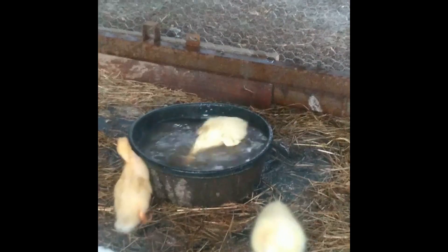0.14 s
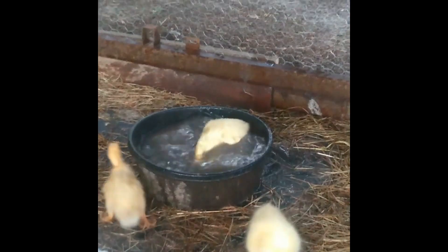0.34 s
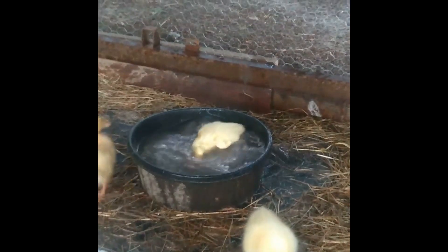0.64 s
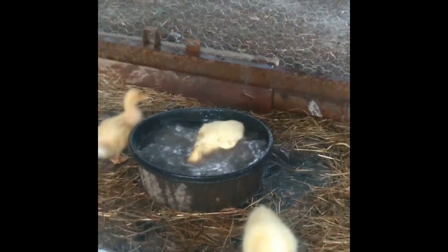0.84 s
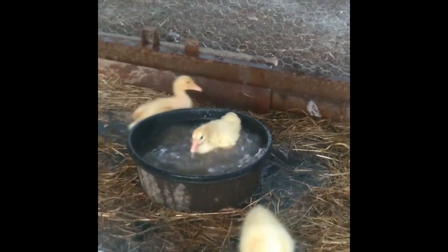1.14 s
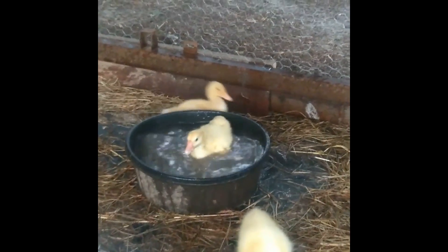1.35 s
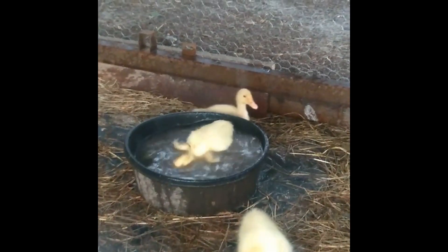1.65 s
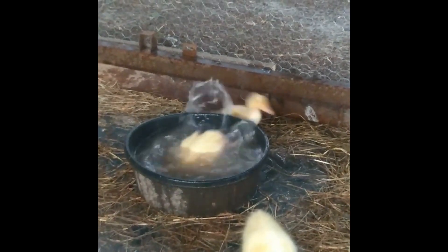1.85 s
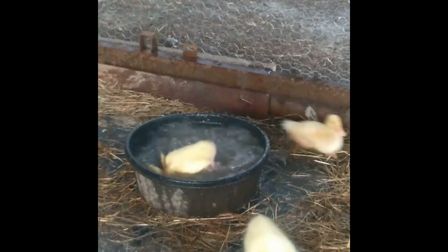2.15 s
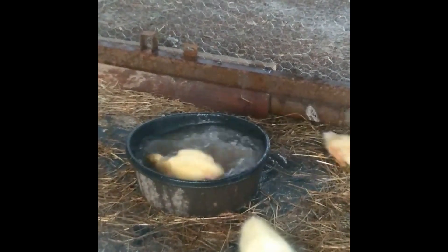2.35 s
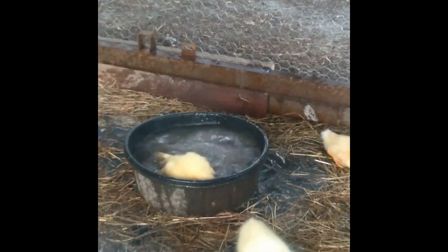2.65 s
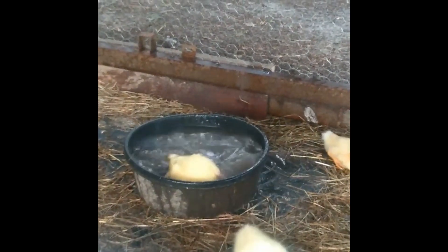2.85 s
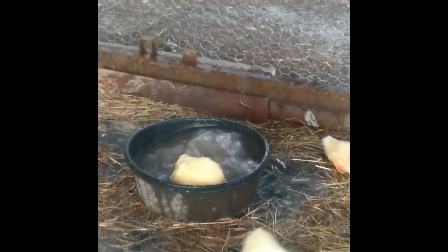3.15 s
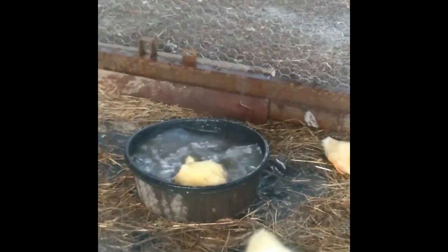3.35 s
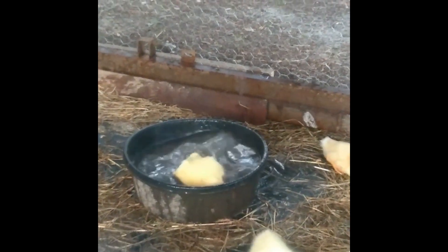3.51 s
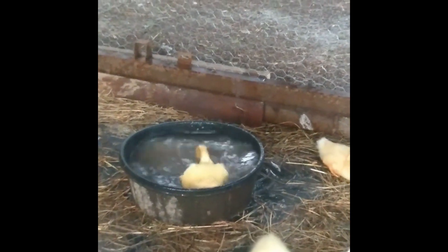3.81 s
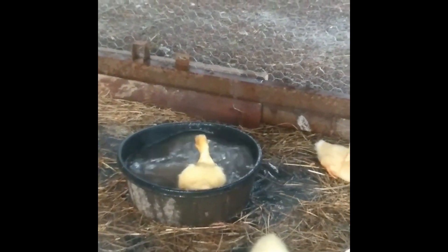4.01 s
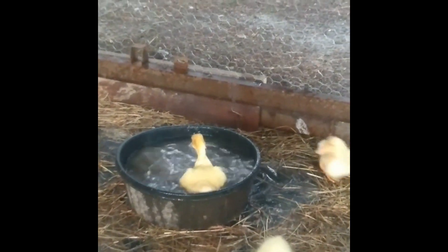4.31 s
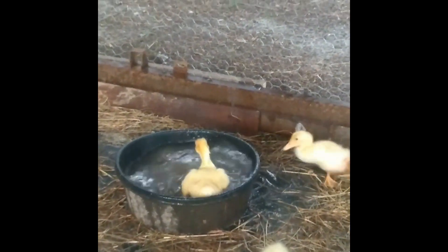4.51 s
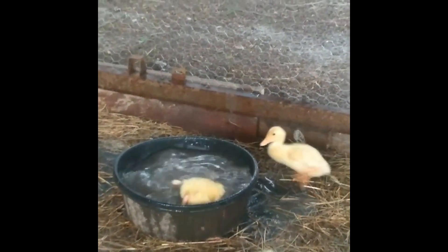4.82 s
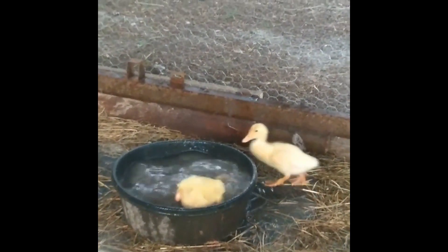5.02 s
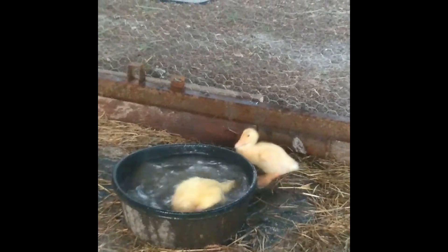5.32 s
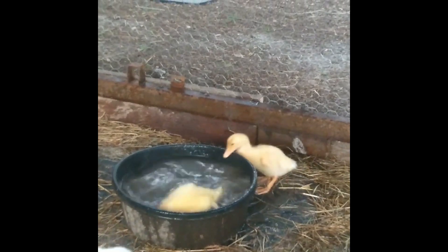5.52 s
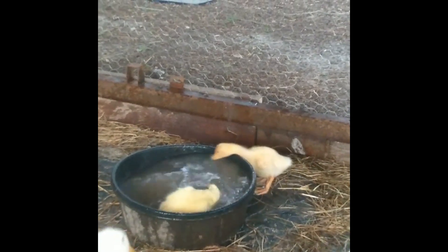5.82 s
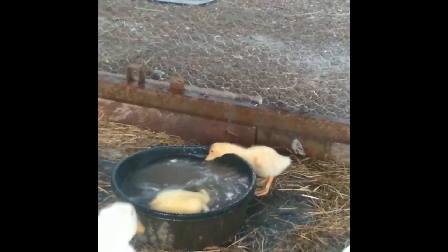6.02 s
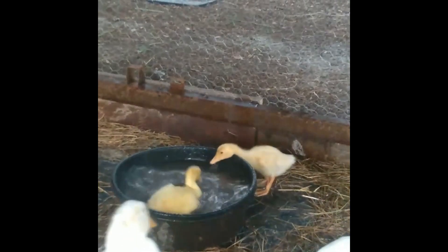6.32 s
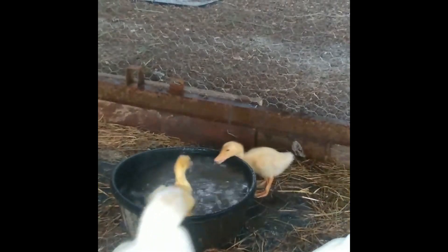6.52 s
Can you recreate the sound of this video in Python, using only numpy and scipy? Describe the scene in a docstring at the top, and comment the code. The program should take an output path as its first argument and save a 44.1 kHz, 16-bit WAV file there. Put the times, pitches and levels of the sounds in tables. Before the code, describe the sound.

After a brief near silence, an outdoor pen fades in at about 0.5 seconds with soft air and a faint hum. Goslings call throughout in high, falling peeps, short chirps and softer breathy notes, busiest between 2 and 3.5 seconds. Around 1 second, one sloshes in a plastic tub with wet pops and squelches. A bigger splash near 2 seconds throws bubbles and crackling spray, followed by low gulps, lapping and scattered drips. A nearby wire panel jingles lightly several times between 1.3 and 3.3 seconds. A distant fowl gives one faint, hoarse call around 3.5 seconds. Then four hard, close knocks hit the panel at about 5.1, 5.5, 6 and 6.5 seconds, the loudest sounds of all: the frame booms, the mesh clatters and single wires ring. A few peeps and drops continue between them, and a light jingle follows the last.

```python
"""Goslings and a bath in a farm pen

Goslings peep, chip and murmur around a plastic tub while one bathes: bubbles ring, spray crackles,
drops land. Something close by, probably the pen's wire panel, jingles lightly and takes four hard
knocks: the frame booms, the mesh clatters, single wires ring. A far fowl calls once over a faint hum."""
import sys
import numpy as np
from scipy import signal
from scipy.fft import rfft, irfft, next_fast_len
from scipy.io import wavfile
from scipy.ndimage import uniform_filter1d

SR = 44100
rng = np.random.default_rng(int(sys.argv[2]) if len(sys.argv) > 2 else 0)


def to_wav(sig):
    """Store sig (one row per channel, or 1-D mono) as 16-bit WAV at the path in sys.argv[1].

    Samples outside -1..1 are clipped; the rate is SR.
    """
    pcm = np.clip(np.atleast_2d(sig), -1, 1) * 32767
    pcm = np.round(pcm).astype(np.int16)
    wavfile.write(sys.argv[1], SR, pcm.T)  # frames by channels


N = 293732
T = np.arange(N) / SR


def undb(db):
    """Decibels to gain."""
    return 10 ** (np.asarray(db) / 20)


def unit(x):
    """Scale to rms 1."""
    return x / np.sqrt(np.mean(x ** 2) + 1e-20)


def loudest(x, db):
    """Set the level of the loudest 50 ms."""
    power = uniform_filter1d(np.mean(np.atleast_2d(x) ** 2, axis=0), SR // 20)
    return x * undb(db) / np.sqrt(power.max() + 1e-20)


def add(out, at_s, x):
    """Mix x into out from at_s on."""
    i = max(int(at_s * SR), 0)
    out[..., i:i + x.shape[-1]] += x[..., :max(N - i, 0)]


def pan(db):
    """Channel gains for a left minus right level."""
    return undb(np.array([[db], [-db]]) / 2)


def spread(x, width):
    """Three independent rows to stereo: one shared, one per side."""
    return np.sqrt(1 - width) * x[0] + np.sqrt(width) * x[1:]


def colour(x, points):
    """Filter by a curve of (frequency [Hz], gain [dB]) points."""
    hz, db = np.transpose(points)
    size = next_fast_len(x.shape[-1])
    bins_hz = np.maximum(np.fft.rfftfreq(size, 1 / SR), 1)
    gain = undb(np.interp(np.log(bins_hz), np.log(hz), db))
    return irfft(rfft(x, size) * gain, size)[..., :x.shape[-1]]


def clicks(size, rate_hz, scatter_db):
    """Three rows of random impulses of uneven strength."""
    hit = rng.random((3, size)) < rate_hz / SR
    sign = rng.choice([-1, 1], (3, size))
    strength = undb(scatter_db * np.clip(rng.standard_normal((3, size)), -2, 2))
    return unit(hit * sign * strength)


def walk(size, rate_hz):
    """Smooth random drift, spread near 1."""
    step = max(int(SR / rate_hz), 2)
    return uniform_filter1d(np.repeat(rng.standard_normal(size // step + 1), step), step)[:size]


def swell(t, rise_s, hold_s, t60_s):
    """Envelope: rise, hold, exponential decay."""
    return np.minimum(t / rise_s, 1) ** 2 * undb(-60 * np.maximum(t - rise_s - hold_s, 0) / t60_s)


def arc(u, crest):
    """Envelope over u = 0..1: up to 1 at the crest (limited to 0.1..0.9), back to 0."""
    return np.sin(np.pi * np.interp(u, [0, np.clip(crest, .1, .9), 1], [0, .5, 1])).clip(0)


def progress(length_s):
    """Ramp from 0 to 1."""
    return np.linspace(0, 1, int(length_s * SR))


def phase_of(hz):
    """Running phase of a pitch curve."""
    return 2 * np.pi * np.cumsum(hz) / SR


def ring(force, modes):
    """Driven damped modes: (frequency [Hz], rms level [dB], t60 [s])."""
    out = 0
    for hz, db, t60_s in modes:
        pole = np.exp((2j * np.pi * hz - np.log(1000) / t60_s) / SR)
        mode = signal.lfilter([1, -1], [1, -2 * pole.real, abs(pole) ** 2], force)
        out = out + undb(db) * unit(mode)
    return out


def direct_plus(tail, tail_db):
    """Impulse response: direct path plus a tail of given energy."""
    response = undb(tail_db) * tail / np.sqrt(np.sum(tail ** 2, axis=1, keepdims=True))
    response[:, 0] += 1
    return response


def scattered(x, echo_db=-2, t60_s=0.069):
    """Short detours over tub, ground and boards roughen a call's glide."""
    t = T[:SR // 10]
    detours = spread(clicks(len(t), 1500, 3), .7) * swell(t, .003, 0, t60_s)
    response = direct_plus(detours, echo_db)
    return signal.fftconvolve(x[None], response, axes=1) / np.hypot(1, undb(echo_db))


def pen(x, tail_db=-16, t60_s=0.48, echo_db=-11, loss_db_per_s=300):
    """Quick echoes off ground, tub and boards, then a short tail."""
    t = T[:SR // 2]
    tail = rng.standard_normal((2, len(t))) * swell(t, 0.015, 0, t60_s)
    response = direct_plus(tail, tail_db)
    for ear in response:
        lags_s = rng.uniform(.002, .018, 5)
        ear[(lags_s * SR).astype(int)] += undb(echo_db - loss_db_per_s * lags_s)
    return signal.fftconvolve(x, response, axes=1)[:, :N]


# outdoor air spectrum: (frequency [Hz], gain [dB])
AIR_SPECTRUM = [(25, -39), (59, -3.5), (117, -6), (270, -18), (439, -20.5), (988, -3.5), (1440, -12.5),
                (2160, -9), (2690, -13.5), (5000, -18.5), (10400, -18), (14400, -66)]


def yard(air_db=-63.5, hum_hz=131, hum_db=-66):
    """Still outdoor air, near mono in the bass, and a wavering hum."""
    noise = rng.standard_normal((3, N))
    side = colour(noise[1:], [(100, -3.5), (500, -3), (1500, -6)])
    mid = colour(noise[0], [(500, 6), (1500, -13)])
    air = unit(colour(mid + side, AIR_SPECTRUM)) * undb(air_db)
    hum = np.sin(phase_of(hum_hz * (1 + 0.024 * walk(N, 24.4))))
    return air + hum * undb(hum_db + walk(N, 33))


# fowl's pitch contour: (time [s], pitch [Hz])
FOWL_PITCH = [(3.27, 504.5), (3.4, 514.6), (3.57, 571.6), (3.68, 553), (3.78, 558), (3.88, 547)]


def fowl(level_db=-59.5, rough=0.063, flutter_db=4):
    """One long, hoarse, distant call, blurred by the yard."""
    times_s, pitch_hz = np.transpose(FOWL_PITCH)
    effort = arc((T - times_s[0]) / (times_s[-1] - times_s[0]), .62) ** 0.14
    phase = phase_of(np.interp(T, times_s, pitch_hz) * (1 + rough * walk(N, 130)))
    tone = sum(undb(db) * np.sin(k * phase) for k, db in enumerate([0, -4, -21], 1))
    call = tone * effort * undb(level_db + flutter_db * walk(N, 30))
    return scattered(call, echo_db=3, t60_s=0.41)[:, :N]


# wet squelches: (time [s], length [s], start pitch [Hz], end pitch [Hz], relative level [dB])
SQUELCH_GLIDES = [(0.866, 0.041, 1946, 1456, -42.5), (1.028, 0.0405, 1739, 2242, -42.5),
                  (1.059, 0.0323, 2190, 1288, -32.5), (1.703, 0.097, 1056, 1290, -54.5)]


def squelches(rough=0.114, flutter_db=3, trim_db=-3):
    """Air squeezed through water: a rough, gliding resonance."""
    out = np.zeros((2, N))
    for at_s, length_s, start_hz, end_hz, db in SQUELCH_GLIDES:
        size = int(length_s * SR)
        hz = np.linspace(start_hz, end_hz, size) * (1 + rough * walk(size, 1200))
        envelope = np.hanning(size) * undb(flutter_db * walk(size, 362))
        add(out, at_s, unit(np.sin(phase_of(hz)) * envelope) * undb(db + trim_db))
    return out


# runs of pops: (time [s], length [s], level [dB])
POP_RUNS = [(0.843, 0.029, -48), (0.89, 0.022, -35), (1.015, 0.055, -44), (1.086, 0.013, -37.5)]
# pop resonances: (frequency [Hz], relative level [dB], t60 [s])
POP_MODES = [(823, 5, 0.017), (1170, 3, 0.014), (1640, -1, 0.021), (2200, -16, 0.016), (6510, -3.5, 0.023)]


def splutters(rate_hz=209.5, jitter=0.14, pop_t60_s=0.0074):
    """Air breaks through water in a quick run of ringing pops."""
    out, t = np.zeros((2, N)), T[:SR // 8]
    for at_s, length_s, db in POP_RUNS:
        cycle = np.cumsum(rate_hz * (1 + jitter * walk(len(t), 200))) / SR % 1
        envelope = undb(-60 * cycle / rate_hz / pop_t60_s) * arc(t / length_s, .5)
        pops = spread(rng.standard_normal((3, len(t))), .15) * envelope
        ringing = colour(ring(pops, POP_MODES), [(7000, 0), (11000, -14)])
        add(out, at_s, unit(ringing) * np.sqrt(length_s / t[-1]) * undb(db))
    return out


# spectrum of spray, drop impacts and lapping: (frequency [Hz], gain [dB])
SPRAY_SPECTRUM = [(300, -51), (1500, -2.5), (4000, 12), (7000, 10), (11000, 13), (16000, 2.5)]
# lapping envelope: (time [s], level [dB])
LAPPING_LEVEL = [(.5, -67.5), (1.8, -63), (2.2, -44), (2.36, -59), (2.8, -65.5), (3.9, -72.5), (4.8, -60),
                 (6.6, -66)]


def lapping(rate_hz=500, swing_db=4):
    """Water laps in the tub with a fine, uneven crackle."""
    crackle = unit(colour(spread(clicks(N, rate_hz, 0.87), 0.95), SPRAY_SPECTRUM))
    return crackle * undb(np.interp(T, *np.transpose(LAPPING_LEVEL)) + swing_db * walk(N, 13))


# drop impacts: (time [s], relative level [dB], ring pitch [Hz])
DROP_IMPACTS = [(0.614, -54.5, 6800), (1.712, -46, 9100), (1.859, -47, 3400), (1.918, -26, 4300),
                (1.934, -29, 4150), (1.979, -32, 3760), (2.053, -34.5, 6800), (2.067, -36, 6160),
                (2.117, -24, 3820), (2.295, -36.5, 4600), (4.157, -45, 10800), (4.456, -47.5, 6900),
                (4.662, -34.5, 10900), (4.683, -35, 7900), (4.836, -51, 9000), (4.990, -32, 4170),
                (5.438, -31.5, 7830), (5.99, -46, 7000), (6.332, -34.5, 3850)]


def drops(crack_t60_s=0.025, splat_t60_s=0.15, splat_db=-9, ping_db=3, trim_db=-4):
    """Each drop lands with a sharp crack, a softer splat and a short ping."""
    out, t = np.zeros((2, N)), T[:SR // 10]
    landing = swell(t, .002, 0, crack_t60_s) + undb(splat_db) * swell(t, .002, 0, splat_t60_s)
    for at_s, db, hz in DROP_IMPACTS:
        impact = unit(colour(spread(clicks(len(t), 9000, 4.5), .6), SPRAY_SPECTRUM)) * landing
        ping = np.sin(2 * np.pi * hz * t) * swell(t, .002, 0, .014)
        add(out, at_s - .001, (impact + undb(ping_db) * ping) * undb(db + trim_db))
    return out


def bubbles(size, centre_hz, width_oct, cycles=34, glide=0.09, count=100):
    """A cloud of small bubbles, each ringing down as its pitch rises."""
    out = np.zeros((2, N))
    places = (np.arange(count) + rng.random(count)) / count
    for place, detune, strength, side in zip(places, *rng.standard_normal((3, count))):
        hz = np.clip(centre_hz * 2 ** (.6 * width_oct * detune), 110, 12000)
        u = np.linspace(0, 1, int(cycles * SR / hz))
        tone = np.sin(2 * np.pi * cycles * u * (1 + glide * u)) * undb(-45 * u)
        add(out, place * size / SR, tone * undb(3.5 * strength) * pan(2.5 * side))
    return unit(out[:, :size])


# sloshes and low gulps: (time [s], t60 [s], level [dB], bubble pitch [Hz])
BATH_SLOSHES = [(.838, 0.21, -43, 965), (.84, 0.53, -43, 185), (0.891, 0.15, -42.5, 1150),
                (1.022, 0.54, -44, 1038), (1.016, 0.72, -47, 201.3), (1.41, 0.38, -53, 1513),
                (1.856, 0.51, -48, 1860), (1.885, 0.62, -40.5, 1375), (1.912, 0.49, -40.5, 1660),
                (1.968, 0.17, -38.5, 1600), (2.042, 0.54, -40.5, 1300), (2.12, 0.5, -59.5, 2880),
                (2.483, 0.13, -57.5, 300), (2.734, 0.11, -55, 295), (3.22, 0.96, -56, 334),
                (3.508, 0.49, -41, 173.5), (3.675, 0.57, -45, 219), (4.149, 0.079, -55, 283),
                (4.667, 0.28, -60.5, 2940), (4.825, 0.073, -50, 254), (6.255, 0.7, -58.5, 2700)]


def sloshes(rise_s=0.0094, width_oct=0.805, foam_db=-13, droplet_db=-4,
            spray_db_per_oct=11.5, spray_even_hz=1430, flutter_db=2.5):
    """The bather throws water: bubbles, foam and spray; the finer the bubbles, the more spray."""
    out, t = np.zeros((2, N)), T[:SR * 2 // 5]
    for at_s, t60_s, db, hz in BATH_SLOSHES:
        foam_band = [(hz * 2 ** (width_oct * k), -3 * k * k - 3 * width_oct * k) for k in range(-4, 5)]
        foam = unit(colour(spread(clicks(len(t), 3000, 5), .2), foam_band))
        crackle = colour(spread(clicks(len(t), 550, 1.5), 1), SPRAY_SPECTRUM)
        crackle = unit(colour(crackle, [(7000, 0), (14000, -12)]))
        droplets = bubbles(len(t), 4600, width_oct, cycles=82, count=120)
        spray = undb(-1) * crackle + undb(droplet_db) * droplets
        spray_db = spray_db_per_oct * np.log2(hz / spray_even_hz)
        water = bubbles(len(t), hz, width_oct) + undb(foam_db) * foam + undb(spray_db) * spray
        envelope = swell(t, rise_s, 0, t60_s) * undb(db + flutter_db * walk(len(t), 133.7))
        add(out, at_s, water * envelope)
    return out


# mesh clatter spectrum: (frequency [Hz], gain [dB])
MESH_SPECTRUM = [(40, -41), (70, 6), (250, 9), (450, -4.5), (700, -5.5), (1300, -6), (2100, -0.5),
                 (3100, -5.5), (4300, -2.5), (5400, -8.5), (8000, -6), (11000, -8), (13000, -24),
                 (16000, -19)]


def mesh(t, force, flutter_db=0.97, t60_s=0.032, places=6):
    """Loose contacts at several places excite short, crowded resonances; near mono in the bass."""
    force = force * undb(flutter_db * walk(len(t), 120.6))
    rattle = 0
    for _ in range(places):
        contacts = clicks(len(t), 1000, 4.2)[:1] * force
        resonances = rng.standard_normal((3, SR // 20)) * swell(T[:SR // 20], 1 / SR, 0, t60_s)
        rattle = rattle + signal.fftconvolve(contacts, resonances, axes=1)[:, :len(t)]
    mid = colour(rattle[0], [(450, -1), (1100, -20)])
    side = colour(rattle[1:], [(200, -18), (1000, 0)])
    return colour(mid + side, MESH_SPECTRUM)


# single wires: (frequency [Hz], relative level [dB])
WIRE_MODES = [(1890, -9), (2336, -6), (2517, -5), (4090, -5), (5870, -10), (6261, -8), (6736, -7),
              (6943, 2), (7686, -6), (8166, -1), (9012, -7), (9260, -5), (9400, -4), (9852, -6),
              (10550, -11), (10978, -10), (11994, -14), (13512, -13)]


def wires(t, rise_s, scrape_s, touched_hz, boost_db=12.5, t60_s=0.22, flutter_db=3):
    """Scraped wires ring, each with its own flutter; those near the touched pitch are boosted."""
    scraping = spread(clicks(len(t), 4000, 4), .8) * swell(t, rise_s, scrape_s, .13)
    out = 0
    for hz, db in WIRE_MODES:
        touch_db = boost_db * np.exp(-((hz - touched_hz) / 300) ** 2)
        wire = ring(scraping, [(hz, db + touch_db + 2 * rng.standard_normal(), t60_s)])
        out = out + wire * undb(flutter_db * walk(len(t), 112.4))
    return out


# light touches: (time [s], length [s], level [dB], touched pitch [Hz])
PANEL_TOUCHES = [(1.275, 0.077, -42.5, 4090), (1.404, 0.0033, -43, 5800), (1.562, 0.049, -48.5, 5930),
                 (2.165, 0.015, -43, 10400), (2.91, 0.017, -42.5, 9410), (3.266, 0.017, -53.5, 9660),
                 (6.092, 0.054, -32.5, 9730), (6.601, 0.023, -34, 10840)]


def jingles(rise_s=0.00082, rustle_db=-13.5, pan_db=-4):
    """A light touch rings the high wires and barely rustles the mesh."""
    out, t = np.zeros((2, N)), T[:SR // 2]
    for at_s, length_s, db, hz in PANEL_TOUCHES:
        ringing = wires(t, rise_s, length_s, hz, boost_db=11, t60_s=0.28, flutter_db=4.5)
        ringing = colour(ringing, [(2600, -20), (3800, 0)])
        rustle = colour(mesh(t, swell(t, rise_s, length_s, 0.17)), [(300, -14), (1500, 0)])
        add(out, at_s, (loudest(ringing, db) + loudest(rustle, db + rustle_db)) * pan(pan_db))
    return out


# panel frame modes: (frequency [Hz], relative level [dB], t60 [s])
FRAME_MODES = [(63.9, -11.5, 1), (86.5, -4, 0.72), (137.6, 0, 0.56), (181.4, 9.5, 0.16),
               (193.5, -1.5, 0.59), (231.6, -8.5, 0.76), (266.5, 0.5, 0.31), (285.7, 1, 0.096),
               (319.6, -7.5, 0.27), (527, -10.5, 0.18)]
# hard knocks: (time [s], rise [s], frame [dB], mesh [dB], wires [dB], scrape [s], touched pitch [Hz])
PANEL_KNOCKS = [(5.07, 0.017, -28.5, -22, -23.5, 0.043, 6820),
                (5.537, 0.0059, -23, -20, -28.5, 0.083, 8500),
                (6.004, 0.0073, -24, -19, -32.5, 0.052, 6830),
                (6.452, 0.015, -27.5, -18.5, -25.5, 0.021, 2440)]


def knocks(shove_s=0.0024, chatter_s=0.086, settle_db=-29, crash_db=2, wires_pan_db=-6):
    """A knock shoves the frame and scrapes the wires; the loose mesh chatters and shakes the frame."""
    out, t = np.zeros((2, N)), T[:SR * 3 // 4]
    for at_s, rise_s, frame_db, mesh_db, wires_db, scrape_s, touched_hz in PANEL_KNOCKS:
        chatter = swell(t, rise_s, chatter_s, 0.38) + undb(settle_db) * swell(t, rise_s, 0, 4.3)
        crash = undb(crash_db) * swell(t, rise_s, 0.028, 0.12)
        ringing = loudest(wires(t, rise_s, scrape_s, touched_hz), wires_db)
        shove = np.exp(-((t - rise_s / 2 - shove_s) / (shove_s / 2)) ** 2)
        shaking = spread(clicks(len(t), 900, 4.3), 0.051) * chatter
        boom = loudest(ring(shove + shaking, FRAME_MODES), frame_db)
        clatter = loudest(mesh(t, chatter + crash), mesh_db)
        # panel on the right: treble shaded on the left
        clatter[0] = colour(clatter[0], [(5500, 0), (9000, -5)])
        add(out, at_s, boom + clatter + ringing * pan(wires_pan_db))
    return out


def whistle(hz, crest, waver, breath_db=-17, octave_db=-29, flutter_db=3):
    """Gosling voice: a gliding tone, a weak unsteady octave and rushing air around the pitch."""
    size = len(hz)
    phase = phase_of(hz * (1 + waver * walk(size, 700)))
    effort = arc(np.linspace(0, 1, size), crest) ** 0.69
    breath = walk(size, 900) * np.sin(phase) + walk(size, 900) * np.cos(phase)
    octave = undb(octave_db + 5 * walk(size, 69)) * np.sin(2 * phase)
    tone = np.sin(phase) + undb(breath_db) * breath + octave
    flutter = undb(flutter_db * walk(size, 154.3))
    return np.sqrt(2) * tone / np.hypot(1, undb(breath_db)) * effort * flutter


# thin whistles: (time [s], start pitch [Hz], level [dB])
THIN_WHISTLES = [(1.745, 5220, -62), (3.227, 4440, -62), (4.34, 4740, -72), (4.508, 5670, -65),
                 (4.746, 5970, -56.5)]


def thin_whistles(length_s=0.13, sag=0.68, crest=0.18, waver=0.019, upper_ratio=1.3, upper_db=-7.5):
    """High, sagging whistles in two voices, one from each side of the syrinx."""
    out = np.zeros((2, N))
    for at_s, start_hz, db in THIN_WHISTLES:
        hz = start_hz * (1 - sag * progress(length_s) ** 3)
        lower = whistle(hz, crest, waver)
        upper = whistle(hz * upper_ratio, crest, waver)
        add(out, at_s, scattered(lower + undb(upper_db) * upper) * undb(db))
    return out


# murmurs: (time [s], top pitch [Hz], level [dB])
MURMUR_CALLS = [(0.531, 2790, -63), (1.073, 2706, -47.5), (1.301, 2390, -58), (1.444, 2810, -52),
                (2.729, 2970, -61), (3.92, 2890, -63), (4.159, 2613, -52.5), (4.531, 2510, -61.5),
                (4.629, 2557, -49), (4.985, 2330, -61.5), (5.84, 3014, -56), (6.385, 2027, -54)]


def murmurs(length_s=0.074, rise=0.49, turn=0.62, crest=0.4, rough=0.031, fifth_db=-17.5, pan_db=-5):
    """Soft, breathy calls that rise and turn, with a hoarse partial a fifth above."""
    out = np.zeros((2, N))
    for at_s, top_hz, db in MURMUR_CALLS:
        hz = top_hz * (1 - rise * (1 - progress(length_s) / turn) ** 2)
        voice = whistle(hz, crest, rough, breath_db=-5, octave_db=-17)
        fifth = whistle(hz * 3 / 2, crest, rough, breath_db=-5)
        add(out, at_s, scattered(voice + undb(fifth_db) * fifth) * undb(db) * pan(pan_db))
    return out


# chips: (time [s], length [s], start pitch [Hz], level [dB], pan [dB])
CHIP_CALLS = [(0.863, 0.1, 4400, -48.5, -6), (1.095, 0.067, 4250, -47, 1), (1.599, 0.08, 5120, -48, 2),
              (1.822, 0.057, 3820, -43.5, -8), (2.025, 0.071, 4330, -41.5, 0),
              (2.392, 0.056, 4975, -41.5, 3), (2.587, 0.041, 3100, -57, -2), (2.89, 0.07, 4070, -46.5, 5),
              (3.079, 0.038, 3700, -62, 9), (3.178, 0.059, 3878, -44, -1.5), (3.354, 0.039, 3880, -56, 12),
              (3.821, 0.078, 4150, -50, 2), (4.838, 0.036, 4150, -47, -7)]


def chips(end_hz=2889, bend=1.4):
    """Short calls that drop in pitch and level off."""
    out = np.zeros((2, N))
    for at_s, length_s, start_hz, db, pan_db in CHIP_CALLS:
        hz = end_hz + (start_hz - end_hz) * (1 - progress(length_s)) ** bend
        voice = whistle(hz, crest=0.62, waver=0.016, breath_db=-19.5, octave_db=-19)
        add(out, at_s, scattered(voice) * undb(db) * pan(pan_db))
    return out


def peep_pitch(length_s, start_hz, middle_hz, knee_hz=3094, plunge_hz=614,
               linger_hz_per_s=1100, plain_s=0.1232, wobble=0.0072):
    """A wavering downward arch, flatter midway in long calls, with a final plunge."""
    u = progress(length_s)
    arch_hz = np.polyval(np.polyfit([0, .5, 1], [start_hz, middle_hz, knee_hz], 2), u)
    linger_hz = linger_hz_per_s * (length_s - plain_s) * np.sin(2 * np.pi * u)
    return (arch_hz - linger_hz - plunge_hz * u ** 8.73) * (1 + wobble * walk(len(u), 67.2))


# peeps: (time [s], length [s], start pitch [Hz], middle pitch [Hz], level [dB], crest [share of length])
PEEP_CALLS = [(0.641, 0.18, 4665, 3784, -44, 0.37), (1.34, 0.198, 4840, 4280, -49, 1),
              (2.093, 0.26, 4950, 4130, -41, 0.61), (2.424, 0.128, 4850, 4505, -37, 0.76),
              (2.57, 0.075, 4750, 4260, -43.5, 0.74), (3.048, 0.15, 4710, 4335, -44.5, 0.8),
              (3.399, 0.11, 4700, 4407, -44.5, 1), (4.881, 0.23, 4550, 3930, -48.5, 0.95),
              (5.214, 0.12, 4840, 4420, -37, 1), (5.867, 0.22, 4440, 3966, -48, 0.32)]


def peeps(waver=0.011, pan_db=2.5):
    """The goslings' long, clear, falling whistles."""
    out = np.zeros((2, N))
    for at_s, length_s, start_hz, middle_hz, db, crest in PEEP_CALLS:
        voice = whistle(peep_pitch(length_s, start_hz, middle_hz), crest, waver)
        add(out, at_s, scattered(voice) * undb(db) * pan(pan_db))
    return out


def scene():
    """Birds and bath with the pen's echoes; drops, lapping, close panel and yard without."""
    goslings = peeps() + chips() + murmurs() + thin_whistles()
    bath = squelches() + splutters() + sloshes()
    return pen(goslings + bath + fowl()) + drops() + lapping() + knocks() + jingles() + yard()


# fade-in: (time [s], gain [dB])
FADE_IN = [(.36, -54), (.44, -15), (.58, -2.5)]


def record(dry, low_hz=42, top_hz=15550):
    """Fade in from near silence; cut the deepest bass and the top."""
    faded = dry * undb(np.interp(T, *np.transpose(FADE_IN)))
    highpass = signal.butter(2, low_hz, "high", fs=SR, output="sos")
    lowpass = signal.ellip(8, .2, 80, top_hz, fs=SR, output="sos")
    return signal.sosfilt(lowpass, signal.sosfilt(highpass, faded))


dry = scene()
out = record(dry)
to_wav(out)
```